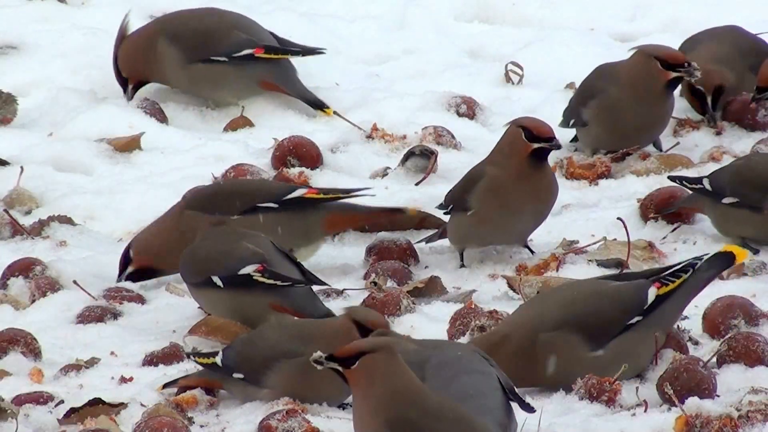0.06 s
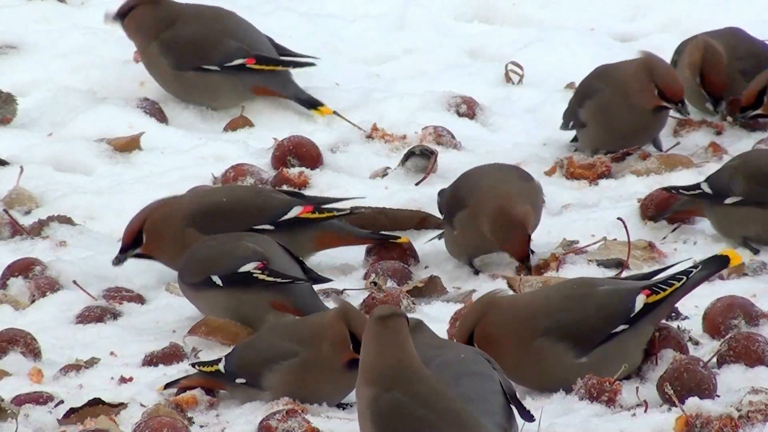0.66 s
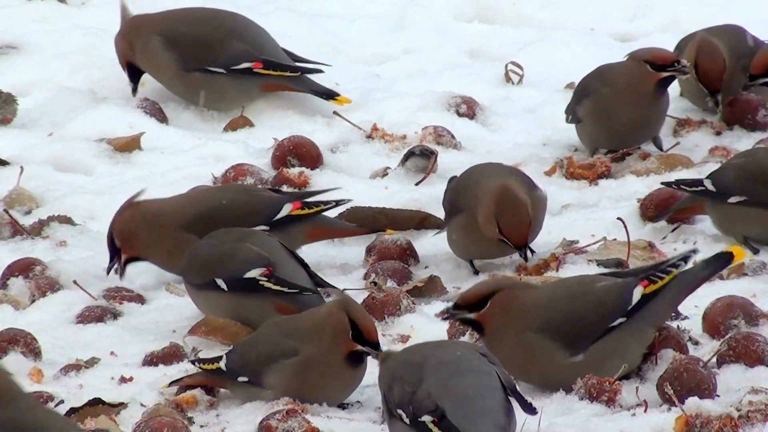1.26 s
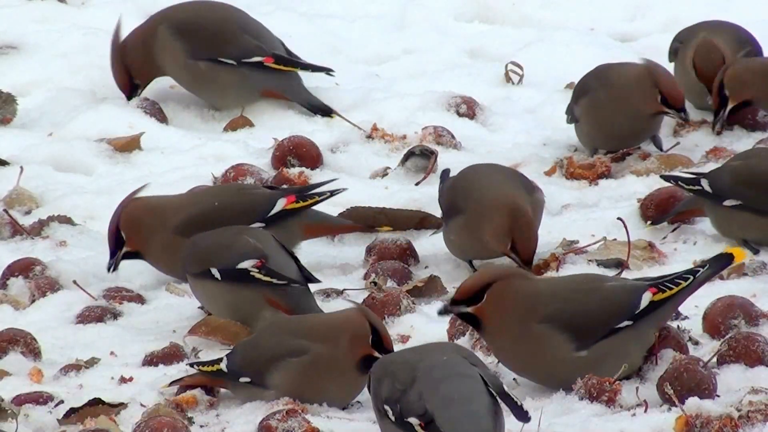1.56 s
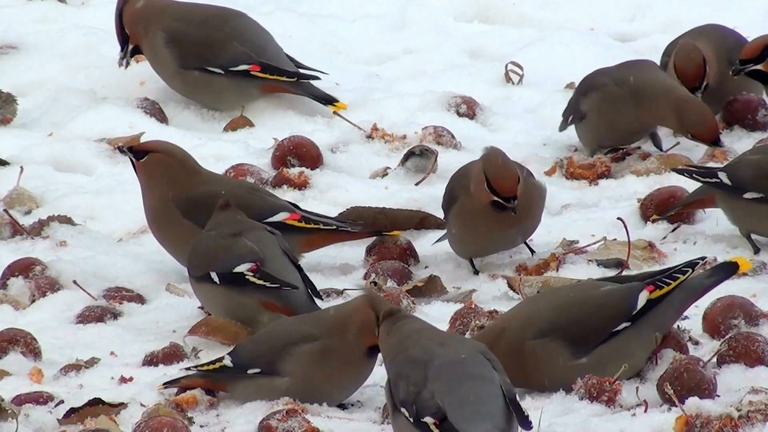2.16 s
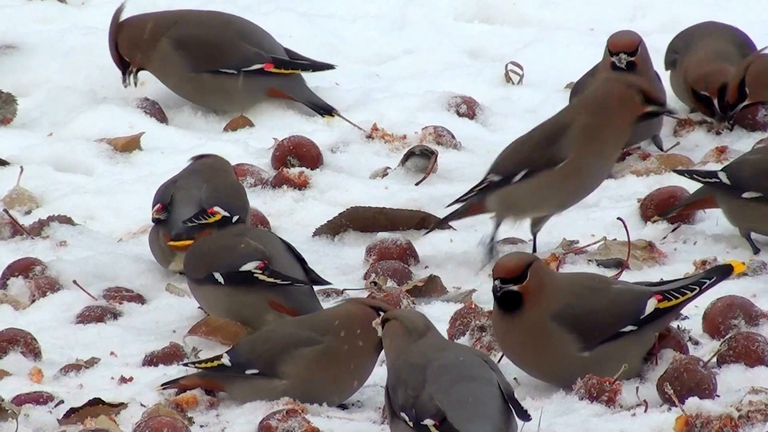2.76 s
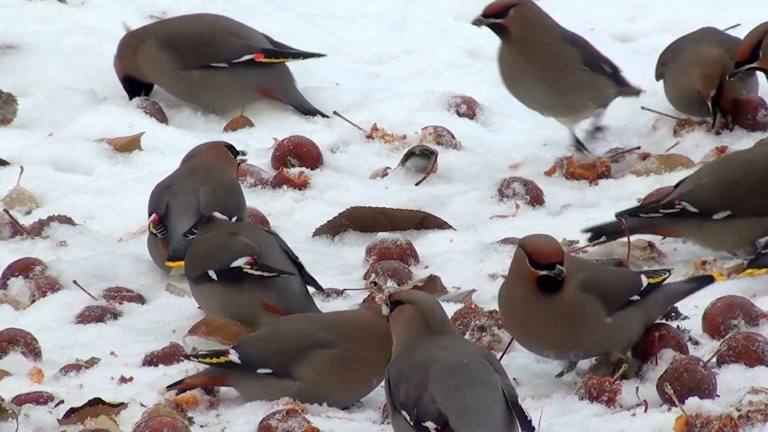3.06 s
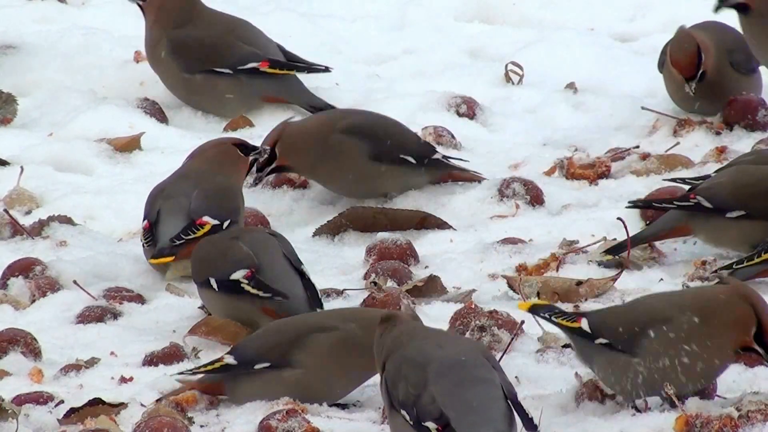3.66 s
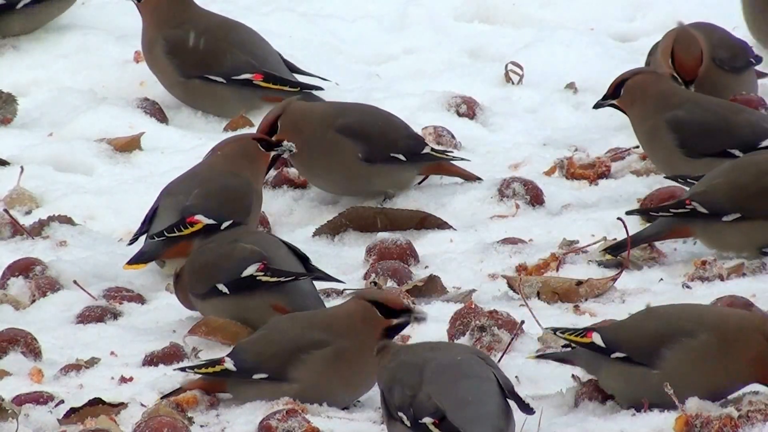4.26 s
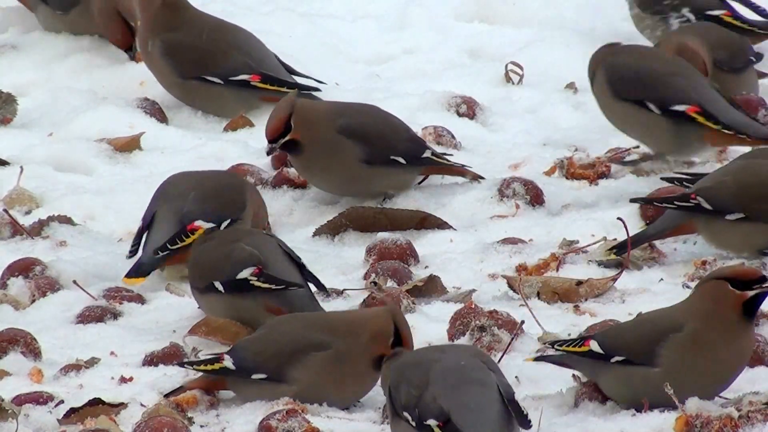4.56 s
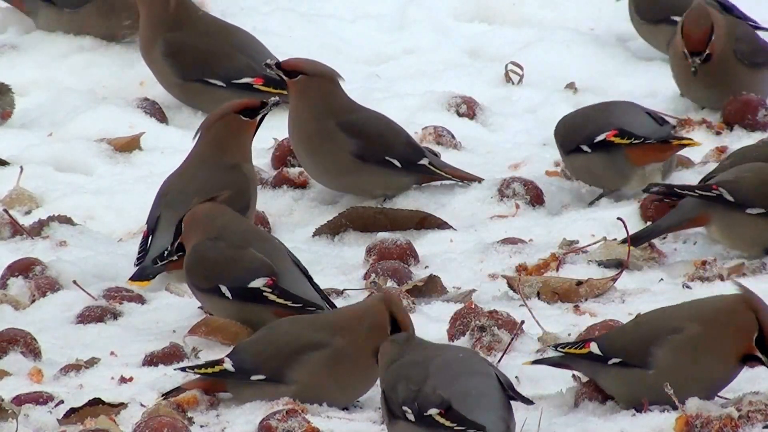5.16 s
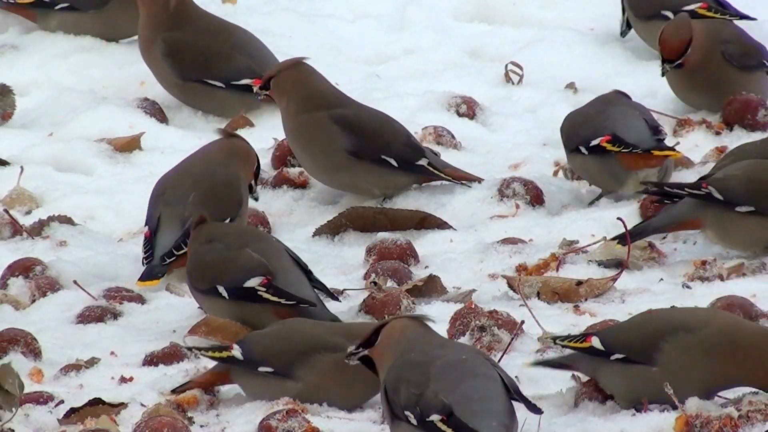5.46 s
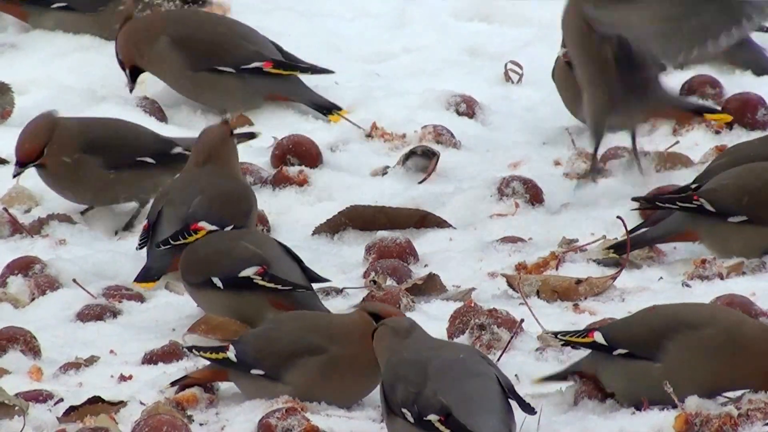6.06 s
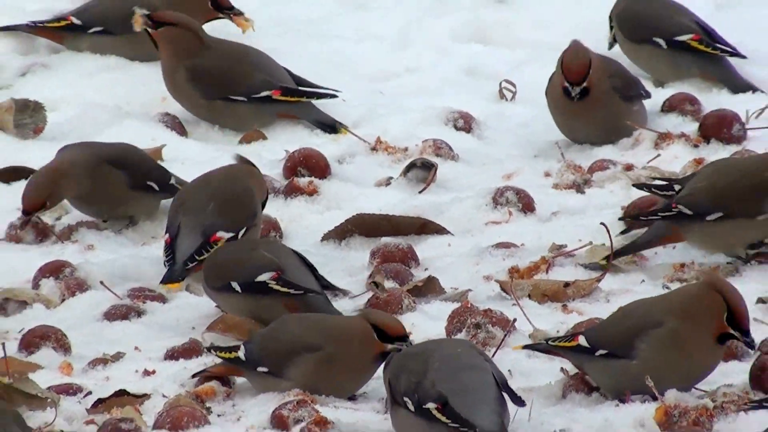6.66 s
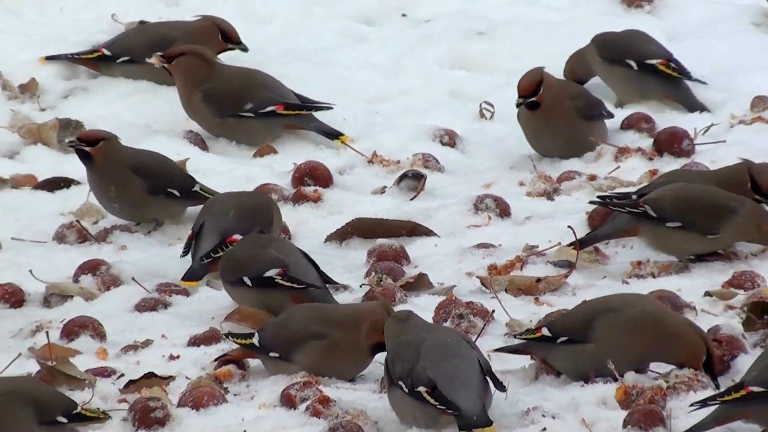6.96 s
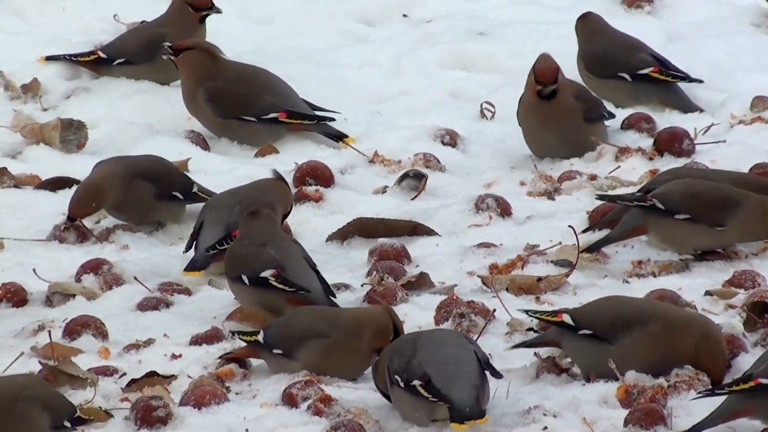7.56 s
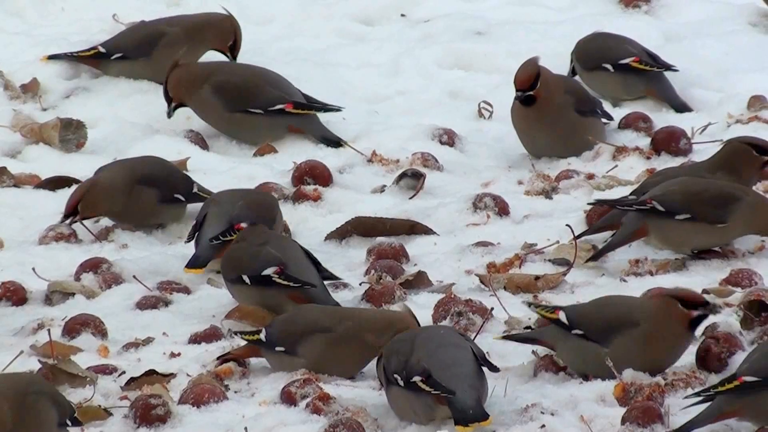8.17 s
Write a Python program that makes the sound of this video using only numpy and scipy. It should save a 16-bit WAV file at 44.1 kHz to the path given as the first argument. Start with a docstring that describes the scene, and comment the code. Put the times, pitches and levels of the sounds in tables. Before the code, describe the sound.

Thin, rapid bird trills overlap outdoors over a steady hiss, joined by scattered beak snaps and a brief flurry of wingbeats.

```python
"""Outdoors in the snow, a flock of waxwings feeds on fallen fruit, trilling over one another.
Each trill is a chain of tiny whistled notes: high ones that slide down, or lower, quicker arches.
Beaks snap and peck with a brief ring, wings whirr and push puffs of air, and snow crunches underfoot.
Far off a crow caws through its throat; behind it all are hiss, a low rumble and a camera's thin whine."""
import sys
import numpy as np
from scipy import signal
from scipy.fft import rfft, irfft, next_fast_len
from scipy.io import wavfile
from scipy.ndimage import map_coordinates

SR = 44100
rng = np.random.default_rng(int(sys.argv[2]) if len(sys.argv) > 2 else 0)


def waveform_to_disk(signal):
    """Save audio, clipped to [-1, 1], as 16-bit WAV at the path in sys.argv[1]."""
    frames = np.transpose(np.atleast_2d(signal))
    scaled = np.clip(frames, -1, 1) * 32767
    samples = np.round(scaled).astype(np.int16)
    wavfile.write(sys.argv[1], SR, samples)


N = 366030


# High trills. The crest is where a trill is strongest (0 = start, 1 = end); pan is left minus right.
# first t/s, last t/s, notes, crest, top f/Hz, fall/(Hz per ms), level/dB, pan/dB
HIGH_TRILLS = [(0.188, 0.523, 9.4, 0.43, 7220, 40.5, -48.5, 1.5), (0.4, 0.527, 4, 0.4, 5950, 37, -54, .5),
               (0.043, 0.09, 2, 0.03, 6050, 26.3, -56, .5), (0.695, 0.926, 6.1, 0.4, 6860, 44, -50.5, 2),
               (0.935, 0.977, 2, 0, 5800, 29.8, -56, 1), (1.005, 1.084, 4.1, 0.15, 6710, 22.1, -52.5, 4),
               (1.03, 1.094, 2.8, 0.4, 6000, 34.4, -56, -2), (1.336, 1.381, 2, 0.43, 6730, 36.5, -48.5, 5),
               (1.476, 1.659, 4.8, 0.52, 7290, 58.8, -51.5, 1),
               (1.583, 1.685, 3, 0.35, 7600, 50.3, -53.5, .5), (2.052, 2.2, 4.2, 0.48, 7100, 42.3, -54, 2),
               (2.22, 2.418, 5, 0.33, 6980, 28.2, -56.5, .5), (2.505, 2.592, 3, 0.5, 6850, 32, -54.5, 3),
               (2.632, 2.732, 3, 0.5, 6950, 41, -50.5, 5), (2.885, 2.92, 2.05, 1, 6550, 34, -59.5, 1),
               (2.96, 3.036, 2.9, 0.7, 6760, 26.1, -62, -1), (3.086, 3.174, 3, 0.85, 7750, 51.7, -54, 0),
               (3.17, 3.325, 6, 0.23, 7130, 30, -52, 1), (3.338, 3.413, 2.8, 0.5, 6350, 24.3, -53, 1),
               (3.451, 3.514, 3, 0.07, 7370, 51.3, -53.5, 3),
               (3.534, 3.563, 1.8, 0.76, 6780, 23.76, -45.5, 1), (3.568, 3.61, 2, 1, 7670, 57.4, -44.5, 1),
               (3.686, 3.781, 3.1, 0.4, 7590, 48.4, -51.5, 8),
               (3.822, 4.002, 5.1, 0.16, 7600, 45.7, -53, 3), (4.106, 4.377, 7, 0.32, 7140, 32.35, -51, .5),
               (4.129, 4.318, 4.6, 0.71, 7600, 43.4, -56, .5), (4.498, 4.707, 4.9, 0.28, 6890, 32, -52, .5),
               (4.827, 4.963, 3.8, 0.52, 7180, 33.8, -57, .5), (5.106, 5.248, 4, 0.4, 7070, 32, -54.5, .5),
               (5.356, 5.572, 6, 0.4, 7060, 42.2, -54.5, 6), (5.49, 5.68, 5, 0.4, 6200, 30, -58, 3),
               (5.631, 5.729, 3.07, 0.6, 7100, 27, -50, 7), (5.787, 5.974, 5, 0.55, 7600, 42.4, -47.5, 2),
               (5.753, 5.891, 4.8, 0.39, 7080, 33.2, -49.5, 5),
               (6.098, 6.285, 5.15, 0.23, 6960, 25.94, -52, 1),
               (6.325, 6.615, 7.1, 0.22, 7200, 25.1, -50, 1), (6.763, 6.898, 3.6, 0.18, 7070, 30.7, -51, 5),
               (6.955, 7.338, 9.2, 0.5, 6950, 28.8, -54.5, .5), (7.008, 7.233, 5.86, 0.3, 7550, 60, -50, 0),
               (7.386, 7.506, 3.96, 0.73, 7520, 51.8, -49, 2),
               (7.606, 7.683, 3.04, 0.6, 7550, 30.8, -50, .5), (7.719, 8.051, 8.24, 0.88, 6834, 40, -51, 3),
               (8.115, 8.278, 4.7, 1, 7000, 30, -49, 4.5), (8.215, 8.25, 2, 1, 6250, 28, -54, 1)]

def near_trills(swell_hz=519.5, swell_db=4.5, scatter_hz=100, note_ms=34):
    """Nearby birds sing: their effort swells and ebbs, lifting pitch and loudness together."""
    song = np.zeros((2, N))
    for first, last, count, crest, top_hz, fall, db, pan_db in HIGH_TRILLS:
        reach = min(1, count / 6)  # short trills stay closer to one pitch
        for s, _, slack in evenly_spaced(first, last, count, crest):
            sharp, strong, steep, long = rng.uniform(-1.7, 1.7, 4)  # no two notes are alike
            hz = top_hz - swell_hz * reach * slack + scatter_hz * sharp
            note = falling_note(hz, fall * np.exp(0.18 * steep), note_ms + 2 * long)
            gain = amp(db + 1 - swell_db * slack + 1.2 * strong)
            add(song, s - .008, placed(gain * note, pan_db))
    return song


# Low trills: first t/s, last t/s, notes, crest, first f/Hz, last f/Hz, sag/Hz, level/dB, tremble/Hz
LOW_TRILLS = [(0, .035, 2, 0, 5300, 5100, 1500, -46, 80),
              (.066, .372, 10, 0.7, 5080, 4650, 1315, -39.5, 105),
              (0.38, 0.779, 12, 0.4, 4560, 4600, 600, -50.5, 90),
              (0.411, 0.764, 12, 0.55, 4920, 4930, 1050, -48, 109),
              (0.794, 1.093, 10, 0.34, 4950, 4500, 810, -43.5, 70),
              (1.13, 1.484, 12, 0.5, 5600, 4570, 900, -50.5, 140),
              (1.741, 2.016, 10, 0.44, 5950, 5850, 705, -54, 171),
              (4.87, 5.369, 16, 0.5, 5500, 5480, 600, -60, 170),
              (7.45, 7.779, 11, 0.85, 4900, 4300, 650, -52.5, 120),
              (7.81, 7.841, 2, 1, 4390, 4800, 1200, -54.5, 150)]

def low_trills(swell_db=6, scatter_hz=40, note_ms=26):
    """Birds sing lower, faster trills of arched notes, most of them sinking in pitch as they go."""
    song = np.zeros(N)
    for first, last, count, crest, first_hz, last_hz, sag_hz, db, tremble_hz in LOW_TRILLS:
        for s, place, slack in evenly_spaced(first, last, count, crest):
            sharp, strong, long = rng.uniform(-1.7, 1.7, 3)
            hz = first_hz + place * (last_hz - first_hz) + scatter_hz * sharp
            note = arched_note(hz, note_ms + long, sag_hz, tremble_hz)
            add(song, s, amp(db + 0.5 - swell_db * slack + strong) * note)
    return song


# How the rest of the flock gets louder and softer: t/s, level/dB
FLOCK_LOUDNESS = [(0.0, -55), (0.23, -63), (0.37, -46.5), (1.11, -63), (1.31, -53), (1.5, -50), (1.87, -58),
                  (2.15, -51.5), (2.75, -67), (2.96, -64), (3.25, -52.5), (3.7, -49), (4.5, -51.5),
                  (5.22, -56.5), (5.92, -51.5), (6.82, -57), (7.01, -51), (7.3, -50), (7.77, -56),
                  (8.3, -55)]

def far_trills(birds=5, pitch_hz=7000, notes_per_s=22, gain_db=-9):
    """More birds trill further off, each with its own drifting pitch and pace."""
    song = np.zeros(N)
    for _ in range(birds):
        effort = wobble(4)
        notes_sung = np.cumsum(notes_per_s * (1 + 0.031 * wobble(1.8))) / SR + rng.random()
        for i in np.flatnonzero(np.diff(np.floor(notes_sung))):
            top_hz = pitch_hz + 300 * effort[i] + 260 * rng.normal()
            note = falling_note(top_hz, fall=36 + 5 * effort[i], length_ms=32)
            add(song, i / SR, amp(1.2 * effort[i]) * note)
    return amp(curve(FLOCK_LOUDNESS) + gain_db) * unit(song)


def falling_note(top_hz, fall, length_ms, rise_ms=6, span_ms=18, plunge_ms=3.4, fade_db=6):
    """A whistle scoops up to its top pitch 8 ms in, slides down ever more gently, then plunges."""
    ms = np.arange(-8, length_ms, 1000 / SR)
    scoop = 1500 * (np.minimum(ms, 0) / rise_ms) ** 2
    slide = fall * span_ms * (np.maximum(ms, 0) / span_ms) ** .68
    plunge = 900 * np.exp((ms - length_ms) / plunge_ms)
    loudness = np.interp(ms, [-rise_ms - 1, 0, length_ms - plunge_ms * 2, length_ms], [0, 1, 1, 0])
    loudness *= amp(-fade_db * (ms / length_ms) ** 2)
    return whistle(top_hz - scoop - slide - plunge, loudness, tremble_hz=70, tremble_db=2.4)


def arched_note(top_hz, length_ms, sag_hz, tremble_hz, rasp_hz=105):
    """A raspy whistle leaps up, sinks through two or three pulses and dies in a quick plunge."""
    place = np.linspace(0, 1, int(length_ms * SR / 1000))
    sag = np.interp(place, [0, .1, .22, .5, .84, 1], [1, .35, 0, .16, .28, 1])
    loudness = np.interp(place, [0, .04, .12, .84, .92, 1], [0, .3, 1, 1, .35, .04])
    rasp = 1 + 0.32 * np.sin(2 * np.pi * (rasp_hz * np.arange(len(place)) / SR + rng.random()))
    ripple = .7 * tremble_hz * wobble(230, len(place))
    return whistle(top_hz + ripple - sag_hz * sag, loudness * rasp, tremble_hz, tremble_db=2.2)


def whistle(hz, loudness, tremble_hz, tremble_db):
    """A bird's voice: one pure tone whose pitch and strength tremble."""
    phase = 2 * np.pi * np.cumsum(hz + tremble_hz * wobble(650, len(hz))) / SR
    tremble = amp(tremble_db * wobble(320, len(hz)))
    return np.sqrt(2) * loudness * tremble * np.sin(phase + rng.uniform(0, 2 * np.pi))


# The clearest snaps and pecks: t/s, level/dB, added knock level/dB, added tick level/dB, pan/dB
CLEAR_PECKS = [(1.573, -37, -17, -16, 1), (1.717, -37, -29, -6, 0), (2.12, -46, -14, 2, 2),
               (2.285, -38, -22, -25, 0), (2.303, -42, -18, -6, -2), (2.352, -48, -8, -8, 0),
               (2.905, -42, -20, -8, 1), (2.974, -53, -20, -8, 0), (3.5647, -47, -24, -20, -1),
               (4.268, -37, -11.5, -9, -2), (4.321, -38, -12, -15, 0), (4.334, -30.5, -12.5, -14, 0),
               (4.3617, -19, -6.5, -20, 0.5), (4.3666, -35, -5, -8, 0), (5.6879, -45, -18, 3.5, 4),
               (5.942, -38.5, -7.5, -22, 0), (6.2513, -15, -31.5, -24, -2.5), (6.2529, -26, -20, -22, -2),
               (6.4213, -31.5, -17, -20, 2), (6.4245, -38, -10, -16, 2), (6.585, -43, -4, -20, 0),
               (7.0226, -34, -11, -29, -1), (7.4703, -32.5, -15, -18, -2), (7.478, -35, -19, -15, 0),
               (7.8328, -36.5, -24, -14, -2)]
# How the beak's snap, the low knock and the high tick ring: f/Hz, width/Hz, level/dB
BEAK_RING = [(3080, 140, -19), (4680, 1030, 9.5), (7900, 590, 2.5)]
KNOCK_RING = [(248, 220, 0), (520, 400, 4.5), (1066, 1060, -2.5), (2170, 860, -5.5)]
TICK_RING = [(8660, 1400, 0)]

def pecks(light_count=10, light_db=-49.5, detune=0.015):
    """Beaks snap and knock on frozen fruit, with light pecks at random in between."""
    out = np.zeros((2, N))
    light = [(when * N / SR, light_db + 4 * force, -14, -20 + 14 * sharp, 0)
             for when, force, sharp in rng.random((light_count, 3))]
    for s, db, knock_db, tick_db, pan_db in CLEAR_PECKS + light:
        damping = np.interp(db, [-35, -14], [2.2, 1])  # light touches ring less than hard snaps
        beak = [(hz * (1 + detune * rng.normal()), width * damping, level)
                for hz, width, level in BEAK_RING]
        snap = amp(3) * strike(beak, grit=0.06, fade_s=0.017, soft_hz=8400)
        knock = amp(knock_db + 6) * strike(KNOCK_RING, grit=.04, fade_s=.025, soft_hz=5500)
        tick = amp(tick_db - 5) * strike(TICK_RING, grit=0.91, fade_s=0.013, soft_hz=11500)
        add(out, s, placed(amp(db) * (snap - knock + tick), pan_db))
    return out


# Dull bumps: t/s, level/dB
DULL_BUMPS = [(0.217, -47), (6.373, -49), (6.483, -50), (6.317, -52), (6.782, -46.5), (7.125, -47.5),
              (8.24, -39.5), (8.257, -44.5)]
# How a bump rings: f/Hz, width/Hz, level/dB
BUMP_RING = [(222, 82, 4.5), (710, 150, 6.2), (1050, 210, 0.84)]

def bumps():
    """Now and then a soft hit rings low and dull."""
    out = np.zeros((2, N))
    for s, db in DULL_BUMPS:
        bump = strike(BUMP_RING, grit=0.045, fade_s=0.063, soft_hz=1430)
        add(out, s, placed(amp(db + 2) * bump, pan_db=3))
    return out


def strike(resonances, grit, fade_s, soft_hz, size=2048, lead=64):
    """A hit and its brief crumbling make an object ring; softness dulls the sound above soft_hz."""
    def softened(x):
        return filtered(ring(x, resonances), lambda hz: 1 / (1 + (hz / soft_hz) ** 12))
    hit = signal.unit_impulse(size, lead)
    crumble = rng.standard_normal(size) * amp(-60 * np.arange(size) / SR / fade_s)
    return softened(hit + grit * np.roll(crumble, lead)) / np.abs(softened(hit)).max()


# Bouts of fluttering and scuffling: t/s, length/s, feather level/dB, low thrum level/dB
FLUTTER_BOUTS = [(0.199, .17, -57, -60.5), (0.8, 0.28, -59, -67), (1.969, .13, -58.5, -60),
                 (2.99, .2, -69, -69), (4.259, .06, -55, -57), (4.709, .17, -53.5, -56),
                 (5.12, .22, -53, -60), (5.899, 0.1, -55.5, -60.5), (6.249, 0.33, -58.5, -66),
                 (6.851, .22, -61.5, -70), (7.472, 0.14, -58, -80)]

def flutter(rise_s=0.2, fade_s=.25):
    """How strong the feather noise and the low thrum are: each bout rises, holds and fades."""
    gains = np.zeros((2, N))
    for s, length, feather_db, thrum_db in FLUTTER_BOUTS:
        bout = curve([(s - rise_s, 0), (s, 1), (s + length, 1), (s + length + fade_s, 0)])
        gains += amp([[feather_db], [thrum_db]]) * bout
    return gains


# The tone of rustling feathers: f/Hz, level/dB
FEATHER_TONE = [(60, -40), (130, -6), (280, -3.5), (700, -2.5), (1200, -4), (2500, -9), (4500, -7.5),
                (8000, -7.5), (11000, -17.5), (14000, -48)]

def wing_whirr(beats_per_s=19, rustle_db=-56.5):
    """Feathers rustle in quick, uneven beats, louder while the birds flutter."""
    beats = np.cumsum(beats_per_s * (1 + .3 * wobble(8))) / SR
    beat_db = 2 * np.sin(2 * np.pi * beats) + 2.4 * wobble(130)
    bouts, _ = flutter()
    return np.hypot(amp(rustle_db), bouts) * unit(stereo_noise(FEATHER_TONE) * amp(beat_db))


# Flicks of a wing: t/s, level/dB, f/Hz
WING_FLICKS = [(4.723, -41, 1700), (4.733, -41, 1700), (4.786, -37.5, 1100), (4.835, -38.5, 803),
               (4.862, -39, 4000), (4.893, -40, 1395), (4.917, -34, 4520), (4.947, -42, 1430),
               (4.975, -37, 4000), (5.012, -38, 3820), (5.025, -39.5, 1290), (5.068, -37, 3700),
               (5.109, -43, 650), (5.122, -41, 2200)]

def wing_flicks(soft_hz=7500):
    """The hardest wing strokes end in a short flick of air."""
    out = np.zeros(N)
    for s, db, hz in WING_FLICKS:
        flick = ring(air_puff(rise_s=0.0019, size=1500), [(hz, 0.49 * hz, 0)])
        add(out, s, amp(db - 0.5) * flick / np.abs(flick).max())
    return filtered(out, lambda hz: 1 / (1 + (hz / soft_hz) ** 4))


# Runs of wingbeats: first t/s, last t/s, beats, crest, level/dB, added flup level/dB
WINGBEAT_RUNS = [(4.573, 4.771, 5, 0.72, -48.5, -1), (4.85, 5.405, 10, 0.27, -46.5, -7.5),
                 (5.455, 5.62, 4, 0.4, -53, 1.5), (5.815, 6.31, 10, 0.3, -49.5, 1),
                 (6.359, 6.583, 5, .7, -52, -8)]
# How the thump (first row) and the flup (second row) ring: f/Hz, width/Hz, level/dB
PUFF_RING = [(105, 73, 0), (238, 130, 0)]

def wingbeats(ebb_db=5):
    """Each downstroke shoves a soft puff of air: a low thump with a hollow flup above it."""
    out = np.zeros(N)
    for first, last, count, crest, db, flup_db in WINGBEAT_RUNS:
        for s, _, slack in evenly_spaced(first, last, count, crest):
            shove = air_puff(rise_s=0.0042, size=4096)
            thump, flup = (ring(ring(shove, [row]), [row]) for row in PUFF_RING)
            puff = thump / np.abs(thump).max() + amp(flup_db) * flup / np.abs(flup).max()
            add(out, s, amp(db - ebb_db * slack + 0.5 * rng.normal()) * puff)
    return out


def air_puff(rise_s, size):
    """Pushed air: noise that swells quickly and dies away."""
    age = np.arange(size) / SR / rise_s
    return rng.standard_normal(size) * age * np.exp(-age)


def grain_pings(count, centre_hz, spread_octaves, ring_cycles, spread_db, grain_db=-49):
    """Tiny grains crack while the birds flutter, snow underfoot or fine crackle in the rustling feathers; each
    grain gives a tiny ping."""
    out, t = np.zeros((2, N)), np.arange(512) / SR
    bouts, _ = flutter()
    share_done = np.cumsum(bouts) / bouts.sum()
    for when, side in rng.random((count, 2)):
        hz = min(centre_hz * 2 ** (spread_octaves * rng.normal()), SR / 4)
        ping = np.sin(2 * np.pi * hz * t) * np.exp(-hz * t / ring_cycles)
        grain = amp(grain_db + spread_db * rng.normal()) * ping
        add(out, np.searchsorted(share_done, when) / SR, np.sqrt([[side], [1 - side]]) * grain)
    return out


# Distant caws: t/s, length/s, voice f/Hz, level/dB, throat f/Hz, hoarseness (share of the pitch)
CROW_CAWS = [(0.703, 0.28, 257, -62.5, 1430, .05), (0.941, 0.15, 248.3, -63, 1430, .05),
             (2.978, 0.23, 245.5, -72, 1460, .1), (5.1, 0.18, 240.6, -62.5, 1330, .25),
             (5.29, 0.19, 238.6, -67, 1330, .3), (5.895, 0.29, 264.3, -68, 1580, .25)]

def crow(throat_width_hz=460):
    """A crow's voice: hoarse, uneven pulses ring in its throat."""
    out = np.zeros(N)
    for s, length, hz, db, throat_hz, hoarse in CROW_CAWS:
        throat = [(throat_hz, throat_width_hz, 0)]
        swell = np.sin(np.linspace(0, np.pi, int(length * SR)))
        pitch = hz * (.93 + .08 * swell + hoarse * wobble(196.3, len(swell)))
        pulses = np.diff(np.floor(np.cumsum(pitch) / SR), prepend=0)  # one pulse per cycle
        voice = unit(ring(ring(pulses, throat), throat))
        add(out, s, amp(db) * np.sqrt(np.abs(swell)) * voice)
    return out


# The tones in the whine: f/Hz, level/dB, waver/dB
WHINE_TONES = [(841, -73.5, 1), (2524, -67, .4), (4061, -75, 1.5), (4100, -76, 1.5), (8392, -73.5, 1)]

def camera_whine():
    """A camera whines in a few faint, wavering tones."""
    out, t = np.zeros(N), np.arange(N) / SR
    for hz, db, waver_db in WHINE_TONES:
        gain = np.sqrt(2) * amp(db + waver_db * wobble(5.7))
        out += gain * np.sin(2 * np.pi * hz * t + 0.076 * wobble(10))
    return out


# The tone of the outdoor hiss and of the rumble: f/Hz, level/dB
HISS_TONE = [(25, -17), (120, 3), (350, -6), (800, -13), (1500, -1), (3000, -7), (4200, -3.5), (6000, -5),
             (9000, -5.5), (12000, -5), (15500, -11)]
RUMBLE_TONE = [(20, -26), (50, -5), (105, -0.5), (165, -4), (250, -5.5), (400, -8), (700, -10),
               (2000, -23.5)]

def open_air(hiss_db=-59, rumble_db=-64.5, throb_db=2, throbs_per_s=18):
    """Steady hiss, and a throbbing rumble that swells as the birds flutter."""
    t = np.arange(N) / SR
    throb = amp(throb_db * np.sin(2 * np.pi * throbs_per_s * t + 2.05 * wobble(3.5)))
    _, thrum = flutter()
    hiss = amp(hiss_db) * stereo_noise(HISS_TONE)
    rumble = np.hypot(amp(rumble_db), thrum) * throb * stereo_noise(RUMBLE_TONE)
    return hiss + rumble


# How alike noise is in the two ears: f/Hz, likeness (1 = the same)
EAR_LIKENESS = [(60, 0.98), (125, 0.99), (250, 0.77), (600, 0.26), (1200, 0.25), (2500, 0.49), (5000, 0.93),
                (8000, 1), (11000, 1)]

def stereo_noise(tone):
    """Noise with the given tone, sounding widest at middle pitches."""
    def shape(hz):
        turn = np.arccos(np.clip(along(EAR_LIKENESS, hz), -1, 1)) / 2
        return amp(along(tone, hz)) * [np.cos(turn), np.sin(turn)]
    mid, side = filtered(rng.standard_normal((2, N)), shape)
    return unit(np.array([mid + side, mid - side]))


def with_echoes(x, echo_db, fade_s, width):
    """Add short echoes from ground, trees and walls, which keep changing as the birds move."""
    hop, t = SR // 4, np.arange(SR // 3) / SR
    decay = amp(-60 * t / fade_s) * (1 - np.exp(-t / 0.0021))
    window = np.sin(np.linspace(0, np.pi, 2 * hop))
    source = np.pad(x.mean(axis=0), (hop, 2 * hop))
    echoes = np.zeros((2, N))
    for start in range(0, N + hop, hop):  # each overlapping piece gets its own random echo
        mid, side = rng.standard_normal((2, len(t))) * decay
        tail = np.array([mid + width * side, mid - width * side]) / np.linalg.norm(mid)
        piece = window * source[start:start + 2 * hop]
        add(echoes, (start - hop) / SR, signal.fftconvolve(piece[None], tail, axes=1))
    return x + amp(echo_db) * echoes


def evenly_spaced(first, last, count, crest):
    """Each event's time, place in the run (0-1) and slack (0 at the crest, 1 furthest from it)."""
    place = np.linspace(0, 1, round(count))
    slack = np.abs(place - crest) / max(crest, 1 - crest)
    return zip(first + place * (last - first), place, slack)


def ring(x, resonances):
    """Let x ring at each (f/Hz, width/Hz, level/dB); neighbours swing opposite ways."""
    return filtered(x, lambda f: sum(
        (-1) ** k * amp(db) * 1j * f * width / (hz * hz - f * f + 1j * f * width)
        for k, (hz, width, db) in enumerate(resonances)))


def filtered(x, response):
    """Turn each frequency in x up or down by response(hz)."""
    n = x.shape[-1]
    padded = next_fast_len(n + 8192)
    return irfft(rfft(x, padded) * response(np.fft.rfftfreq(padded, 1 / SR)), padded)[..., :n]


def wobble(rate, size=N):
    """A smooth curve through `rate` random values a second."""
    points = rng.standard_normal(int(size * rate / SR) + 4)
    return map_coordinates(points, [np.arange(size) * rate / SR])


def along(points, hz):
    """Read between (f/Hz, value) points, spaced by octaves."""
    f, value = np.transpose(points)
    return np.interp(np.log(hz + 1), np.log(f + 1), value)


def curve(points):
    """Join (t/s, value) points with straight lines."""
    return np.interp(np.arange(N) / SR, *np.transpose(points))


def add(track, s, x):
    """Mix x into the track at s seconds."""
    start = round(s * SR)
    part = x[..., max(-start, 0):max(N - start, 0)]
    track[..., max(start, 0):][..., :part.shape[-1]] += part


def placed(x, pan_db):
    """Two channels, the left pan_db louder than the right."""
    return x * amp([[pan_db / 2], [-pan_db / 2]])


def amp(db):
    """Turn decibels into a multiplier."""
    return 10 ** (np.asarray(db) / 20)


def unit(x):
    """Scale x to an average strength (rms) of 1."""
    return x / np.sqrt(np.mean(x ** 2) + 1e-20)


def scene():
    """The flock on the snow, with the open air around it."""
    near = with_echoes(near_trills(), echo_db=-5.3, fade_s=0.26, width=0.45)
    low = with_echoes(placed(low_trills(), pan_db=.9), echo_db=-6, fade_s=0.34, width=0.35)
    far = with_echoes(placed(far_trills(), pan_db=.8), echo_db=0, fade_s=0.25, width=0.4)
    # small things give off no deep bass
    taps = filtered(pecks() + bumps(), lambda hz: (hz / (hz - 90j)) ** 2)
    taps = with_echoes(taps, echo_db=-19, fade_s=.03, width=1.2)
    caws = with_echoes(placed(crow(), pan_db=5), echo_db=2.5, fade_s=0.25, width=0.17)
    crackle = grain_pings(count=170, centre_hz=4350, spread_octaves=0.47, ring_cycles=2.1, spread_db=1)
    wings = wing_whirr() + wing_flicks() + wingbeats()
    crunch = grain_pings(count=160, centre_hz=1100, spread_octaves=0.88, ring_cycles=0.86, spread_db=3)
    return near + low + far + taps + wings + crunch + crackle + caws + camera_whine() + open_air()


def record(dry, top_hz=15800):
    """Cut away the very highest treble."""
    return filtered(dry, lambda hz: hz < top_hz)


dry = scene()
out = record(dry)
waveform_to_disk(out)
```